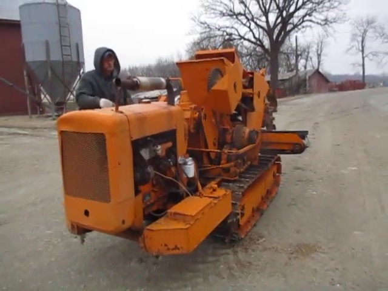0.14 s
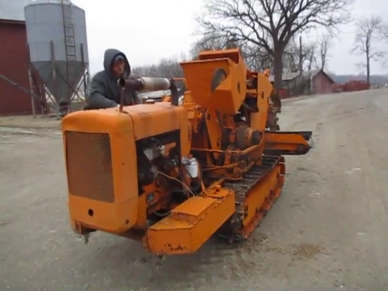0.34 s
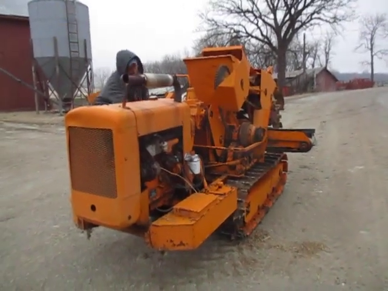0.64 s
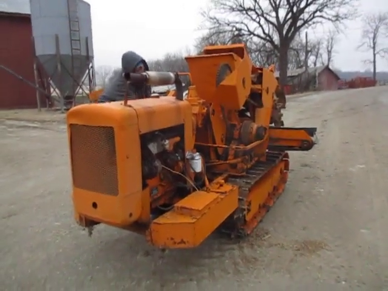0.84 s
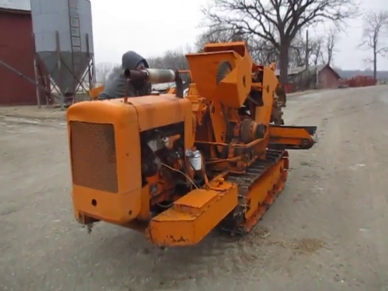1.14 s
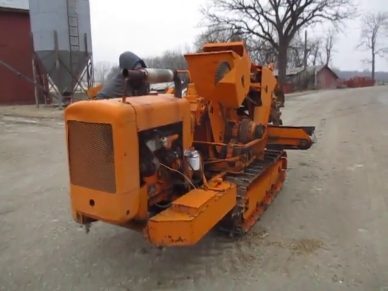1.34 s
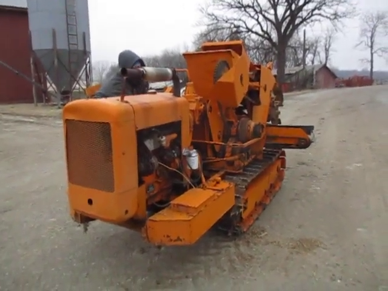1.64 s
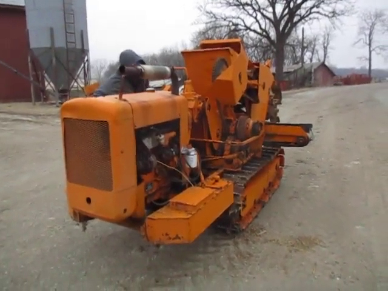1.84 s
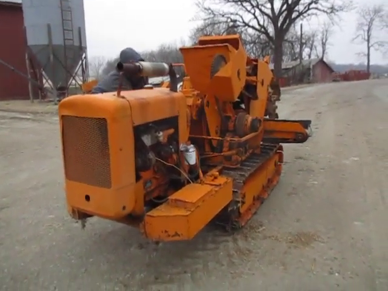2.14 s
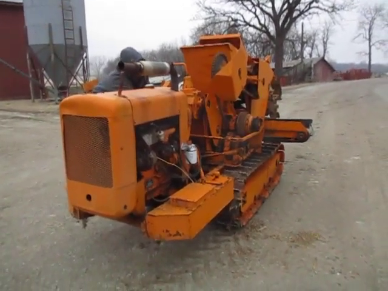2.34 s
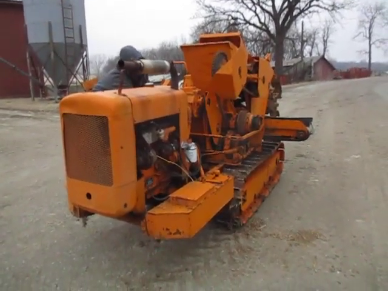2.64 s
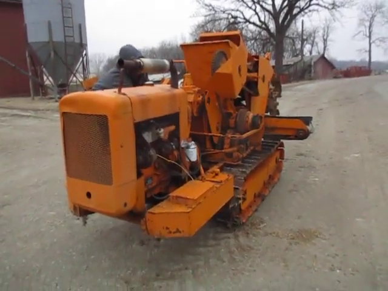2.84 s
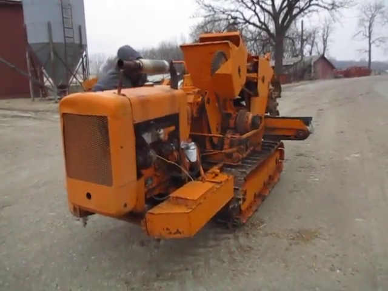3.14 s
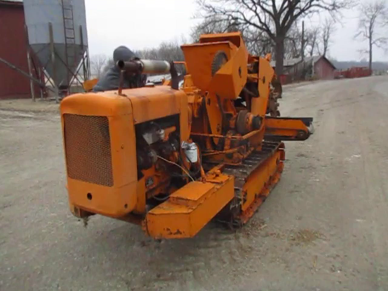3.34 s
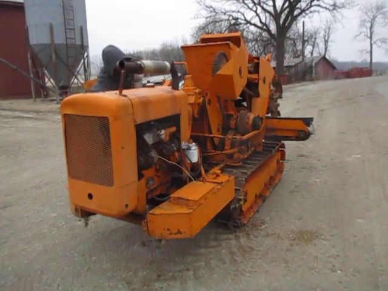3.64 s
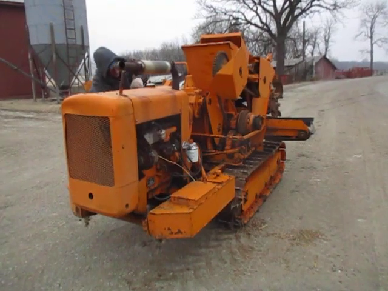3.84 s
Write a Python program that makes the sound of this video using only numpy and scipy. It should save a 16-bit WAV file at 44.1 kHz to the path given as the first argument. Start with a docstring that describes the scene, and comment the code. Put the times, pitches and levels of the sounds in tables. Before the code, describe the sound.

A starter motor cranks a cold diesel outdoors. Until about 1.9 s, low wind buffets overload the microphone, strongest near 0.7 s, with faint air noise, small ticks, a slight scrape and a soft hiss near 0.95 s. At 1.92 s metal slams in; gears grind and ring, pulsing about six or seven times a second from 2.3 to 3.8 s. A dull engine rumble joins at 3.5 s; grinding dips briefly, then resumes to 4 s.

```python
"""A starter motor cranks a cold diesel on a tracked machine in a windy gravel yard.
The pinion slams in and the gears grind the flywheel over: noisy tooth contacts swell on every compression
stroke, gear teeth clack as noise bursts and the bell housing rings as sagging sines.
A dull engine rumble comes up late. Wind buffets the microphone with filtered noise and soft single swings;
behind it lie the yard's air noise, a far fan's hum, a short hiss, ticks and a scrape."""
import sys
import numpy as np
from scipy import signal
from scipy.fft import rfft, irfft
from scipy.io import wavfile
from scipy.ndimage import uniform_filter1d

SR = 44100
rng = np.random.default_rng(int(sys.argv[2]) if len(sys.argv) > 2 else 0)


def generate_wav(signal):
    """Clip the signal to [-1, 1] and save it as 16-bit WAV at the path in sys.argv[1]."""
    frames = np.transpose(np.atleast_2d(signal))
    scaled = np.clip(frames, -1, 1) * 32767
    pcm = np.round(scaled).astype(np.int16)
    wavfile.write(sys.argv[1], SR, pcm)


N = 176400  # samples

# Steady grinding of the starter under the strokes: [t/s, growl level/dB, gear hiss level/dB]
CRANK_LEVELS = [(1.921, -90, -90), (1.925, -21.5, -36), (1.95, -18.5, -29), (2.05, -20, -30),
                (2.14, -21, -26.5), (2.25, -15, -20.5), (2.33, -21, -31.5), (2.5, -22, -30),
                (2.8, -32, -32.5), (3.2, -27.5, -31.5), (3.7, -34.5, -32.5), (3.85, -74, -37.5),
                (3.868, -63, -74), (3.905, -32, -49.5), (4.0, -31, -31)]
# Compression strokes, timed where the swell begins: [t/s, growl level/dB, gear hiss level/dB, hold/s]
COMPRESSION_STROKES = [(2.335, -19.5, -23.5, 0.092), (2.504, -18, -20.5, 0.058), (2.663, -14, -22.5, 0.041),
                       (2.82, -16.5, -26, 0.058), (2.963, -18, -23, 0.052), (3.095, -18.5, -24.5, 0.065),
                       (3.254, -17.5, -22.5, 0.046), (3.404, -18, -24, 0.061), (3.577, -18, -26, 0.038),
                       (3.74, -20.5, -35, 0.089)]
GROWL_RISE_S, GROWL_FALL_DB_PER_S = 0.052, 285
HISS_RISE_S, HISS_FALL_DB_PER_S = 0.019, 389
# Tone balance of the low grinding: [f/Hz, relative level/dB]
GROWL_SPECTRUM = [(70, -22), (227, -15.5), (376, -7.5), (659, -10), (773, -5.5), (1700, -22.5),
                  (2210, -23.5), (3740, -120)]
# Tone balance of the gear hiss: [f/Hz, relative level/dB]
GEAR_HISS_SPECTRUM = [(880, 10.5), (1500, 3.5), (2160, -7.5), (2380, 8.5), (2850, -2), (6510, -3.5),
                      (11500, -15.5), (15800, -29)]
TEETH_PER_S, TEETH_SPREAD_DB, TOOTH_T60_S = 250, 4, 0.011
# Resonances of block and covers: [f/Hz, relative level/dB]
CASTING_MODES = [(765, 10.5), (915, 2.5), (1000, 1.5), (1200, 6.5), (1810, -8.5), (1990, -14),
                 (2420, -19.5), (3510, -15.5), (5250, -19), (5750, -17.5), (6550, -21.5)]
CASTING_Q, SHIMMER_DB = 36, 2
CASTING_IN_GROWL_DB, CASTING_IN_HISS_DB = -4.5, -3.5  # before growl and hiss are levelled

# Bell housing driven into ringing: [t/s at full swell, main mode level/dB, f/Hz, hold/s]
HOUSING_RINGS = [(1.981, -7.5, 753, 0.0068), (2.167, -15.5, 850, 0.012), (2.199, -13, 802.5, 0.048),
                 (2.351, -12, 974, 0.0033), (2.403, -14, 813, 0.042), (2.53, -12.5, 934, 0.016),
                 (2.567, -9.5, 789, 0.011), (2.702, -6, 776, 0.0023), (2.725, -16, 781, 0.0097),
                 (2.864, -9.5, 742, 0.0036), (2.972, -17.5, 942, 0.0037), (2.999, -10.5, 834, 0.0042),
                 (3.29, -9.5, 789, 0.0026), (3.31, -14.5, 781, 0.0051), (3.446, -9.5, 756, 0.0074),
                 (3.617, -13.5, 568, 0.0061)]
RING_RISE_S, RING_T60_S, RING_SAG_HZ_PER_S = 0.00448, 0.054, 1270
RING_UPPER_HZ, RING_UPPER_DB = 1204, -12.5  # second mode, relative to the first

# Gear backlash clacks: [t/s, level/dB]
BACKLASH_CLACKS = [(1.9556, -26), (1.9776, -22), (2.1172, -23), (2.145, -32), (2.1666, -21),
                   (2.1857, -19.5), (2.2371, -18), (2.348, -15), (2.463, -25.5), (2.5112, -21),
                   (2.676, -23), (2.6964, -18.5), (2.837, -22), (3.27, -25), (3.511, -27), (3.6233, -25),
                   (3.7718, -25), (3.8212, -23), (3.9, -39)]
CLACK_TOP_DB, CLACK_T60_S, CLACK_SPLIT_HZ = -12.5, 0.058, 6770
CLACK_RING_DB = -14  # casting against the clacks, rms
ENGAGE_S, ENGAGE_DB, ENGAGE_TOP_DB, ENGAGE_T60_S = 1.9222, -13, 3, 0.083
# Ring of the pinion in the slam, mixed in at half amplitude: [f/Hz, relative level/dB, t60/s]
PINION_MODES = [(5320, 8, 0.045)]

RUMBLE_S, RUMBLE_DB = 3.5, -32

# Wind on the microphone: [t/s, level/dB]
GUST_LEVELS = [(0, -29), (.1, -23), (.27, -41.5), (.33, -32.5), (.6, -32), (.8, -30.5), (1.05, -26),
               (1.47, -22.5), (1.85, -37.5), (2.03, -22.5), (2.17, -25.5), (2.56, -35), (2.71, -28.5),
               (2.82, -43), (4, -60)]
# Tone balance of the wind: [f/Hz, relative level per Hz/dB]
WIND_SPECTRUM = [(30, -0.5), (90, 3.5), (180, -1), (280, -12), (420, -25.5), (600, -45)]
LUMPS_DB, LUMPS_PER_S = 2.6, 25
# Single buffets, timed at their crest: [t/s, level/dB, f/Hz]
WIND_BUFFETS = [(0.024, -12.5, 118), (0.058, -12, 269), (0.073, -15.5, 196), (0.108, -17, 233),
                (0.331, -29, 196), (0.646, -11.5, 158), (0.594, -17.5, 270), (0.655, -15.5, 276),
                (0.669, -8, 154.0), (0.685, -5, 154), (0.696, 1.5, 296), (0.710, -15.5, 280),
                (0.992, -15, 345), (1.011, -13.5, 216), (1.175, -8.5, 239), (1.196, -10, 152),
                (1.338, -14, 174), (1.392, -8.5, 254), (1.428, -11, 233), (1.458, -8, 313),
                (1.488, -16, 274), (1.542, -11, 245), (1.601, -10.5, 210), (1.62, -12.5, 228),
                (1.686, -15.5, 183.0), (1.767, -13, 121), (1.784, -9.5, 237), (1.857, -16.5, 190),
                (1.868, -18.5, 198), (1.953, -9, 152), (2.671, -14, 153)]
BUFFET_CYCLES, BUFFET_EDGE_DB = 0.38, -15.5
WAKE_DB, WAKE_T60_S, WAKE_HZ = -13.5, 0.12, 306  # turbulence after a buffet, relative to it

# Tone balance of the yard's air noise: [f/Hz, relative level per Hz/dB]
YARD_SPECTRUM = [(350, -41), (600, -0.5), (800, -7), (1170, -1.5), (1380, -6.5), (6860, -14.5),
                 (15800, -21)]
# Level the air noise wavers about: [t/s, level/dB]
YARD_LEVELS = [(0, -69), (.4, -57), (.52, -52), (.69, -57), (.71, -64.5), (.93, -59.5), (1.05, -56.5),
               (1.92, -60), (4, -71)]
# A far fan: [f/Hz, rms level/dB]
FAN_HUM = [(1200, -70)]
# Small ticks nearby, level before their band-pass: [t/s, level/dB]
NEARBY_TICKS = [(0.6956, -18), (0.7940, -28), (0.8650, -33), (1.2317, -16), (1.269, -32.5), (1.3330, -30),
                (1.464, -30)]
TICK_T60_S = 0.00081
PUFF_S, PUFF_LENGTH_S, PUFF_DB, PUFF_LOW_HZ, PUFF_HIGH_HZ = 0.939, 0.093, -52, 6000, 12100
SCRAPE_S, SCRAPE_DB, SCRAPE_T60_S = .6015, -38.5, 0.037

CUTOFF_HZ = 16400


def from_db(db):
    """Decibels to gain."""
    return 10 ** (np.asarray(db) / 20)


def rms_one(x):
    """Scale to unit rms."""
    return x / np.sqrt(np.mean(x ** 2) + 1e-20)


def in_time(rows):
    """Table columns as sample-rate curves."""
    s, *columns = np.transpose(rows)
    return [np.interp(np.arange(N) / SR, s, c) for c in columns]


def drift(rate_hz):
    """Slow random wander of rms 1: low-passed noise made at a twentieth of the sample rate."""
    pole = np.exp(-40 * np.pi * rate_hz / SR)
    noise = rng.standard_normal(N // 20 + 2002)
    slow = signal.lfilter([1], [1, -2 * pole, pole * pole], noise)[2000:]  # drop the settling
    return np.interp(np.arange(N) / 20, np.arange(len(slow)), rms_one(slow))


def band(x, low_hz, high_hz):
    """Second-order band-pass."""
    edges = [low_hz, min(high_hz, .45 * SR)]
    return signal.sosfilt(signal.butter(2, edges, "band", fs=SR, output="sos"), x)


def colour(x, spectrum):
    """Give a flat signal a spectrum, falling away beyond its ends; rms 1."""
    hz, db = np.transpose(spectrum)
    log_f = np.log(np.maximum(np.arange(N // 2 + 1) * SR / N, 1))
    beyond = np.maximum(np.log(hz[0]) - log_f, 0) + np.maximum(log_f - np.log(hz[-1]), 0)
    gain = from_db(np.interp(log_f, np.log(hz), db) - 44 * beyond)
    return rms_one(irfft(rfft(x) * gain, N))


def add(out, s, x):
    """Mix x into out from time s."""
    i = max(int(s * SR), 0)
    out[i:i + len(x)] += x[:N - i]


def starter():
    """Grinding gears: growl below, gear hiss above, the casting's resonances ringing in both."""
    growl_db, hiss_db = in_time(CRANK_LEVELS)
    contact = teeth()
    body = casting(contact)
    low_body = from_db(CASTING_IN_GROWL_DB) * band(body, 310, 1390)
    high_body = from_db(CASTING_IN_HISS_DB) * rms_one(band(body, 2330, 9300))
    growl = rms_one(colour(contact, GROWL_SPECTRUM) + low_body) * from_db(0.81 * drift(27))
    hiss = rms_one(colour(contact, GEAR_HISS_SPECTRUM) + high_body) * from_db(0.77 * drift(44))
    growl_gain = stroke_gain(growl_db, 1, GROWL_RISE_S, GROWL_FALL_DB_PER_S)
    hiss_gain = stroke_gain(hiss_db, 2, HISS_RISE_S, HISS_FALL_DB_PER_S)
    return growl * growl_gain + hiss * hiss_gain


def stroke_gain(steady_db, column, rise_s, fall_db_per_s):
    """Steady level plus one rise, hold and fall for every compression stroke, summed as power."""
    t, power = np.arange(N) / SR, from_db(steady_db) ** 2
    for row in COMPRESSION_STROKES:
        age, hold = t - row[0], row[3]  # the hold includes the rise
        fall_db = fall_db_per_s * np.maximum(age - hold, 0)
        swell = np.clip(age / rise_s, 0, 1) * from_db(row[column] - fall_db)
        power = power + swell ** 2
    return np.sqrt(power)


def teeth():
    """Dense uneven tooth contacts, each a tiny dying noise burst, over a steady bed; flat in spectrum."""
    sizes = from_db(2 * TEETH_SPREAD_DB * np.minimum(rng.exponential(1, N), 2))  # as power
    hits = sizes * (rng.random(N) < TEETH_PER_S / SR)
    power = signal.lfilter([1], [1, -from_db(-120 / (TOOTH_T60_S * SR))], hits)
    return rms_one(np.sqrt(power / power.mean() + 1.81) * rng.standard_normal(N))


def casting(x):
    """The block's resonances ring on whatever shakes it, each swelling and fading on its own."""
    out = 0
    for k, (hz, db) in enumerate(CASTING_MODES):
        pole = np.exp(-np.pi * hz / CASTING_Q / SR)
        poles = [1, -2 * pole * np.cos(2 * np.pi * hz / SR), pole * pole]
        mode = rms_one(signal.lfilter([1, 0, -1], poles, x))
        sign = (-1) ** k  # neighbours alternate in polarity
        out = out + sign * from_db(db + SHIMMER_DB * drift(23)) * mode
    return rms_one(out)


def housing():
    """The bell housing rings in two modes: each ring swells, holds and dies, its main pitch sagging."""
    out, t = np.zeros(N), np.arange(SR // 8) / SR
    for s, db, hz, hold in HOUSING_RINGS:
        decay = from_db(-60 * np.maximum(t - RING_RISE_S - hold, 0) / RING_T60_S)
        shape = np.clip(t / RING_RISE_S, 0, 1) * decay
        main = np.sin(2 * np.pi * (hz - RING_SAG_HZ_PER_S * t / 2) * t)
        upper = from_db(RING_UPPER_DB) * np.sin(2 * np.pi * RING_UPPER_HZ * t)
        add(out, s - RING_RISE_S, from_db(db) * shape * (main + upper))
    return out


def clacks():
    """The engaging slam with the pinion's ring, then the backlash clacks, which also ring the casting."""
    slam, out, t = np.zeros(N), np.zeros(N), np.arange(SR // 8) / SR
    ring = sum(from_db(db - 60 * t / t60) * np.sin(2 * np.pi * hz * t) for hz, db, t60 in PINION_MODES)
    impact = clack(rng.standard_normal(len(t)), ENGAGE_TOP_DB, ENGAGE_T60_S)
    add(slam, ENGAGE_S, from_db(ENGAGE_DB) * (impact + ring / 2))
    noises = rng.standard_normal((len(BACKLASH_CLACKS), len(t)))
    for (s, db), noise in zip(BACKLASH_CLACKS, noises):
        add(out, s, from_db(db) * clack(noise, CLACK_TOP_DB, CLACK_T60_S))
    body = rms_one(band(casting(out + 1e-18), 1300, 17000)) * np.std(out)
    return slam + out + from_db(CLACK_RING_DB) * body


def clack(noise, top_db, t60):
    """A sharp metal contact: a burst that dies, the top dying twice as fast."""
    fade = from_db(-60 * np.arange(len(noise)) / SR / t60)
    top = rms_one(band(noise, CLACK_SPLIT_HZ, 12100)) * from_db(top_db) * fade
    return (rms_one(band(noise, 2900, CLACK_SPLIT_HZ)) + top) * fade


def rumble():
    """Dull engine rumble: band-passed noise that swells in a tenth of a second and stays."""
    rise = np.clip((np.arange(N) / SR - RUMBLE_S) * 10, 0, 1)
    return from_db(RUMBLE_DB) * rise * rms_one(band(rng.standard_normal(N), 118, 570))


def wind():
    """Lumpy rumble under the gust curve, plus buffets: one soft swing with a sharper crest and a wake."""
    gust_db, = in_time(GUST_LEVELS)
    lumps = rms_one(from_db(LUMPS_DB * drift(LUMPS_PER_S)))
    out = from_db(gust_db) * colour(rng.standard_normal(N), WIND_SPECTRUM) * lumps
    wake_power, fade = np.zeros(N), from_db(-120 * np.arange(SR // 4) / SR / WAKE_T60_S)
    phases = rng.uniform(-1.26, -0.34, (len(WIND_BUFFETS), 1))
    for (s, db, hz), phase in zip(WIND_BUFFETS, phases):
        turn = np.arange(-2, 4, hz / SR)  # cycles from the crest
        width = BUFFET_CYCLES * np.where(turn > 0, 1.2, 1)  # slower away than in
        swing = np.cos(2 * np.pi * turn + phase) * np.exp(-(turn / width) ** 2)
        crest = from_db(BUFFET_EDGE_DB) * np.cos(2 * np.pi * 2.19 * turn) * np.exp(-(turn / 0.27) ** 2)
        add(out, s - 2 / hz, from_db(db) * (swing + crest))
        add(wake_power, s - .006, from_db(2 * (db + WAKE_DB)) * fade)
    low_pass = signal.butter(3, WAKE_HZ, fs=SR, output="sos")
    churn = rms_one(signal.sosfilt(low_pass, band(rng.standard_normal(N), 45, 690)))
    wake_gain = np.sqrt(np.maximum(uniform_filter1d(wake_power, size=300), 0))
    return out + wake_gain * churn


def yard():
    """Far air noise, a fan's faint sine hum, a short bright hiss, filtered ticks and a noise scrape."""
    t = np.arange(N) / SR
    level_db, = in_time(YARD_LEVELS)
    out = from_db(level_db + 0.74 * drift(30)) * colour(rng.standard_normal(N), YARD_SPECTRUM)
    out += sum(np.sqrt(2) * from_db(db) * np.sin(2 * np.pi * hz * t) for hz, db in FAN_HUM)
    puff = np.sin(np.pi * np.clip((t - PUFF_S) / PUFF_LENGTH_S, 0, 1)) ** .6
    out += from_db(PUFF_DB) * puff * rms_one(band(rng.standard_normal(N), PUFF_LOW_HZ, PUFF_HIGH_HZ))
    tick = band(from_db(-60 * t[:600] / TICK_T60_S), 500, 8200)
    for s, db in NEARBY_TICKS:
        add(out, s, from_db(db) * tick)
    scrape = rms_one(band(rng.standard_normal(900), 900, 2000))
    add(out, SCRAPE_S, from_db(SCRAPE_DB - 60 * t[:900] / SCRAPE_T60_S) * scrape)
    return out


def scene():
    """Everything at one microphone."""
    return (starter() + housing() + clacks() + rumble() + wind() + yard())[None]


def record(dry):
    """Peaks clip near full scale and a steep low-pass cuts the top."""
    low_pass = signal.cheby2(16, 80, CUTOFF_HZ, fs=SR, output="sos")
    return signal.sosfilt(low_pass, np.clip(dry, -.96, .96))


dry = scene()
out = record(dry)
generate_wav(out)
```